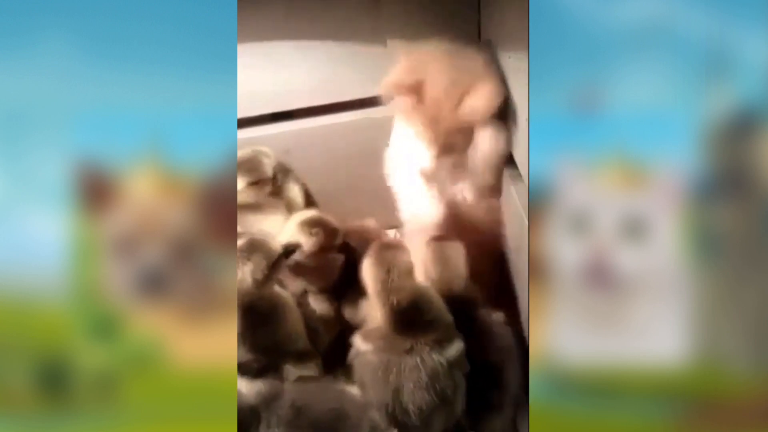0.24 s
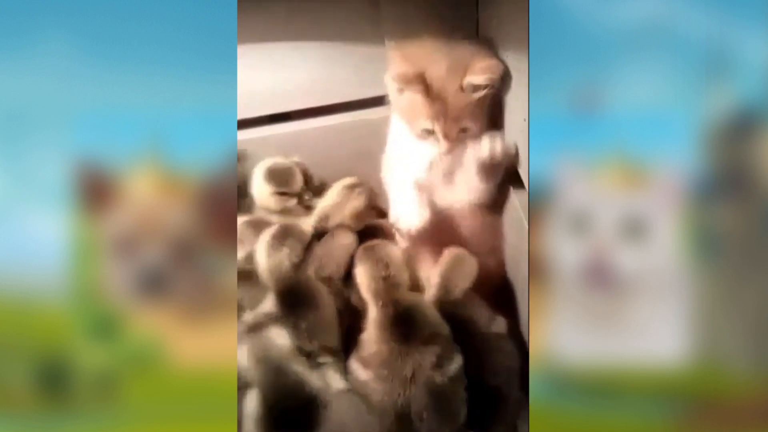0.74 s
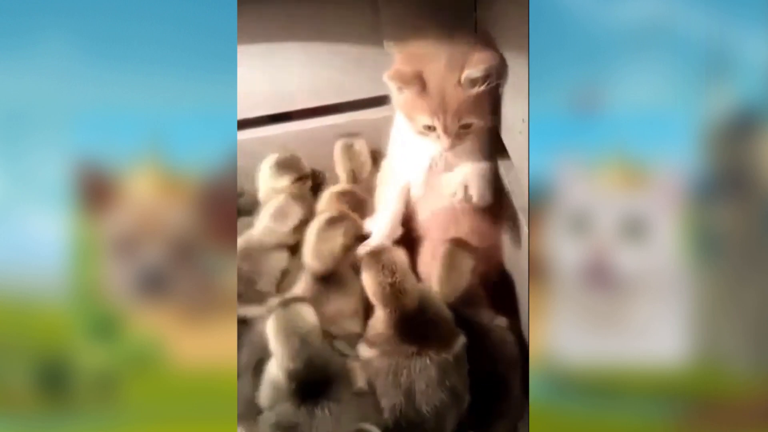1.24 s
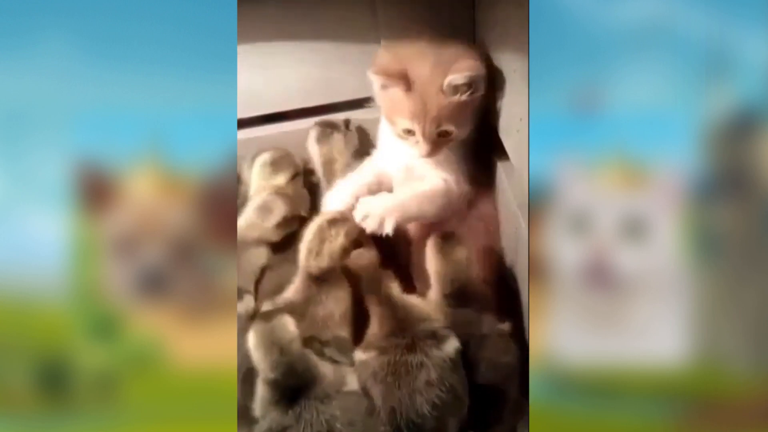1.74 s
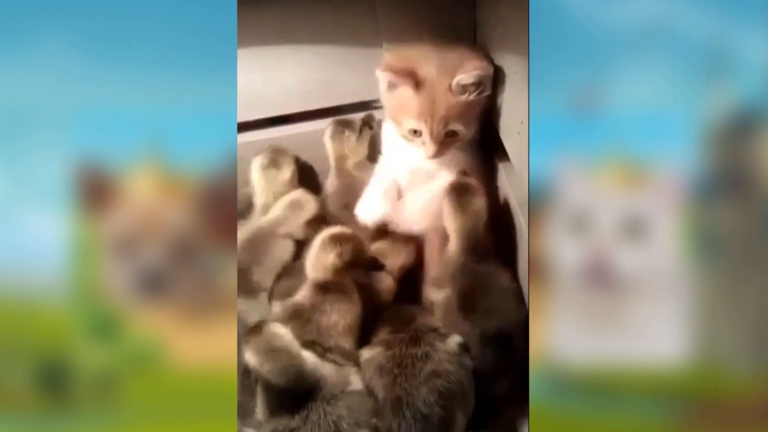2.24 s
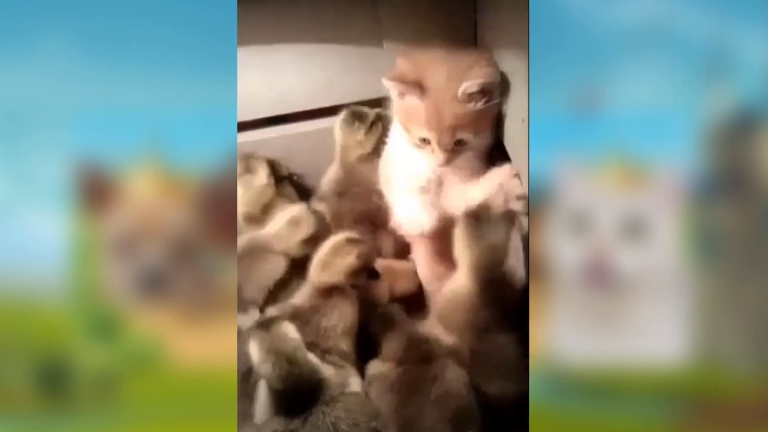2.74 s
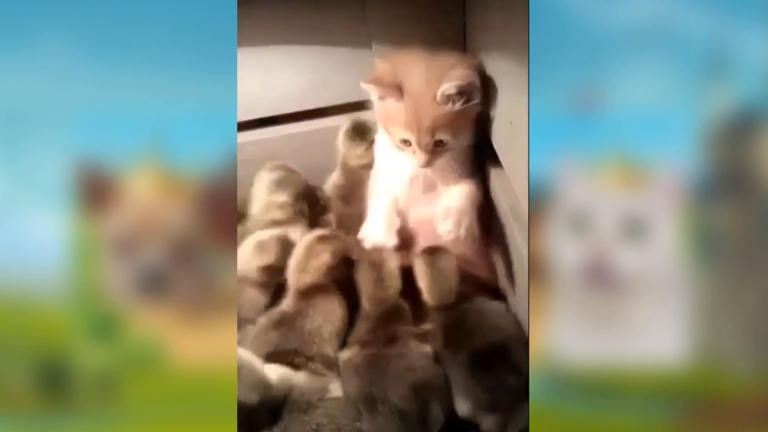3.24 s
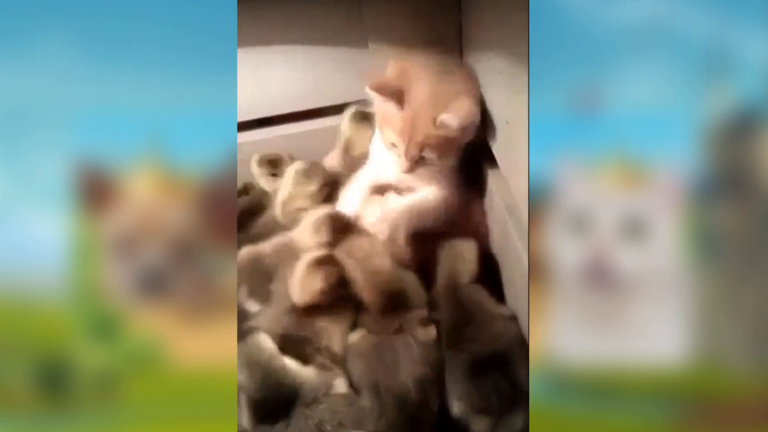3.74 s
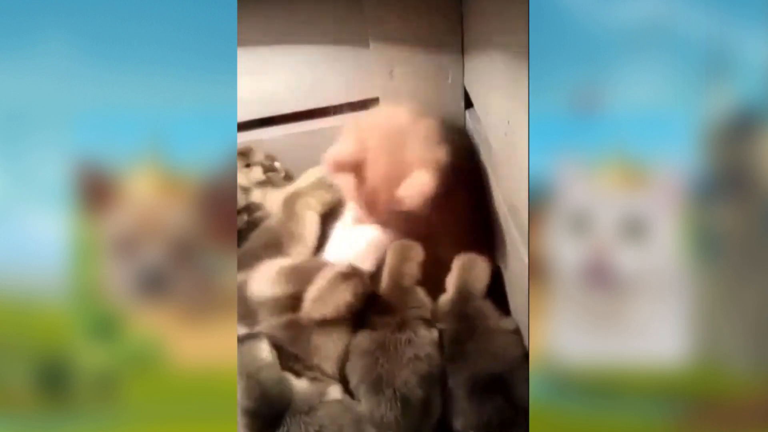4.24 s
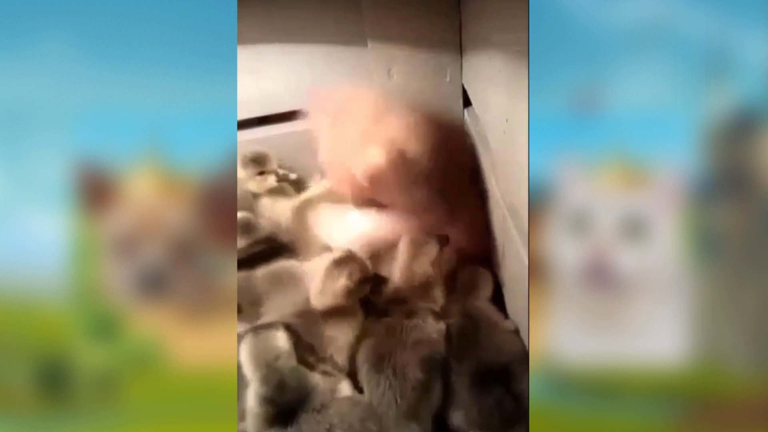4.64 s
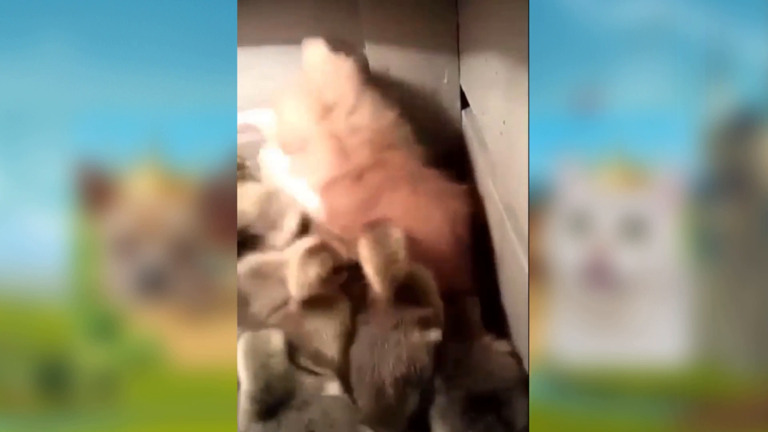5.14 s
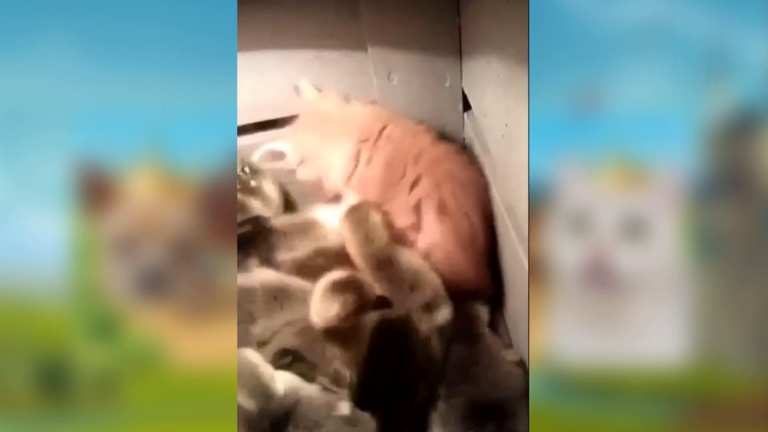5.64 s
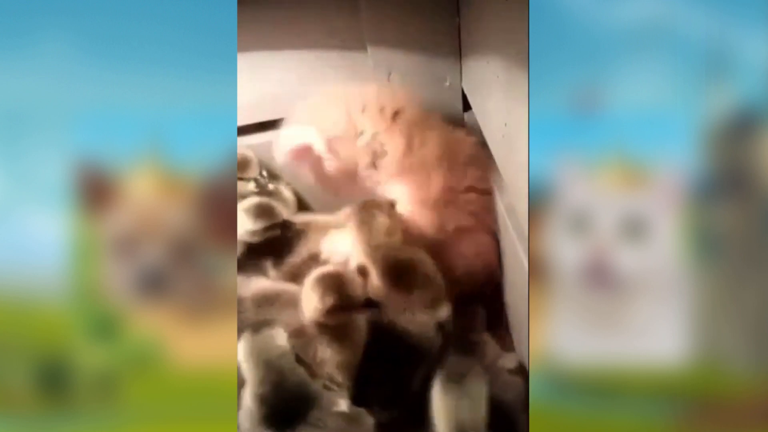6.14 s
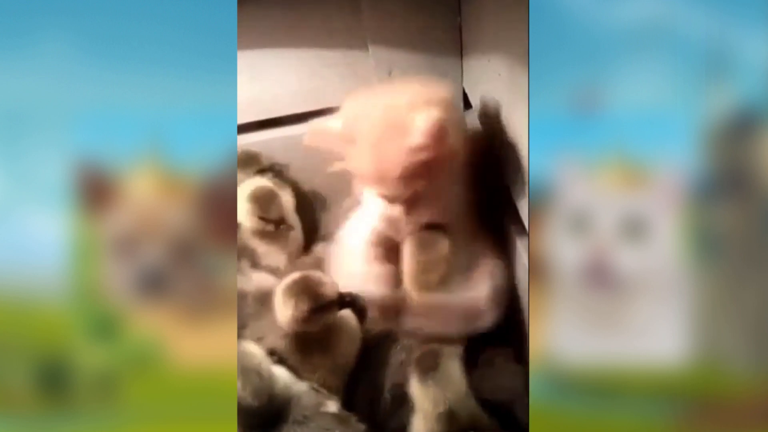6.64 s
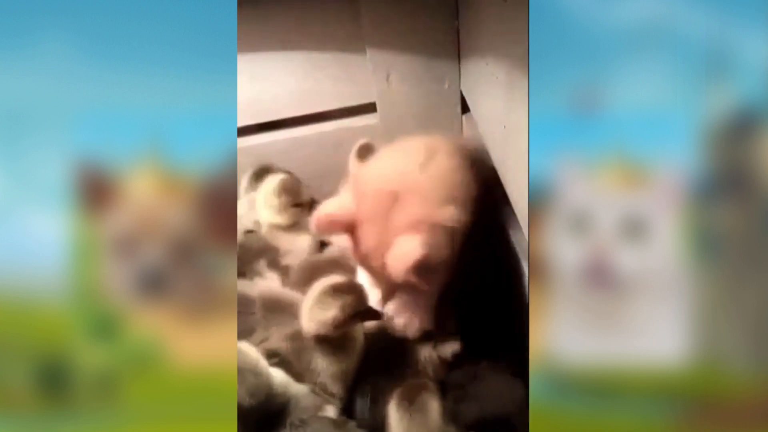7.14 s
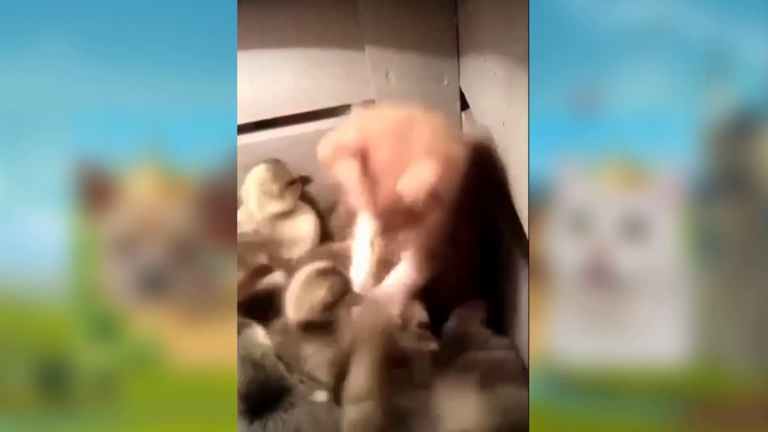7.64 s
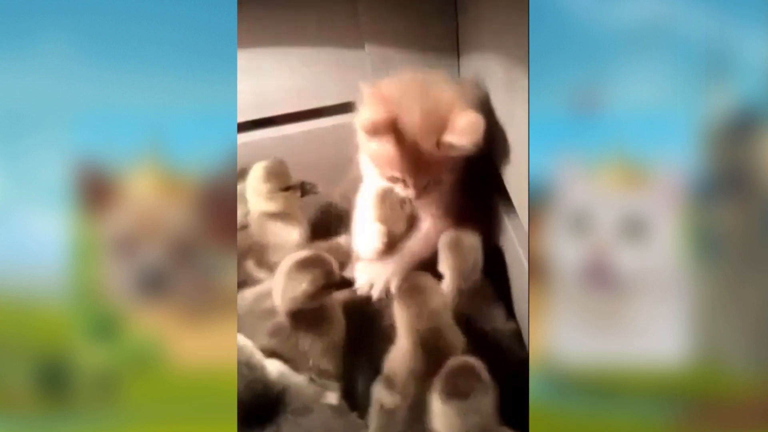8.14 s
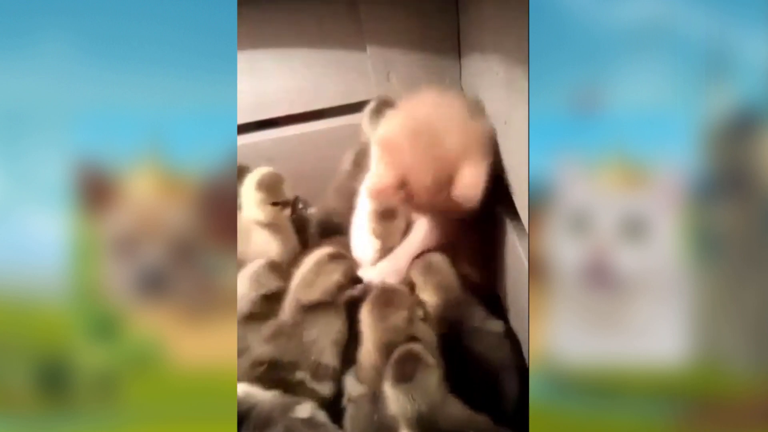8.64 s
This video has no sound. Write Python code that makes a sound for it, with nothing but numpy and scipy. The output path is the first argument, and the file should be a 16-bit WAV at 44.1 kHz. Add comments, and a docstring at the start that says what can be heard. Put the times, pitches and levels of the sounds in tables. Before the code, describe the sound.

Short, thin, high duckling chirps run throughout, some clear and piercing, others faint and hoarse from deep in the huddle. Underneath, bodies rub dryly on cardboard, webbed feet patter and claws tick. Dull boxy knocks fall irregularly, clustering around four, six and just before eight seconds. Heard close up, with quick reflections from box walls and a small quiet room.

```python
"""A crowd of ducklings peeps in a cardboard box while a kitten paws among them, all heard close by.
Each peep is a near-pure whistle that arches up and down in pitch, with unsteady overtones and a little hiss.
Paws and feet knock the panels: damped sines for dents and box modes, low noise for the flexing panel.
Claws and bills tick and scrape, as shaped noise bursts over a noise rustle that rises and falls as bodies
rub on the card. Box walls and a small room answer as decaying noise echoes; a faint murmur of air lies beneath."""
import sys
import numpy as np
from scipy import signal
from scipy.fft import rfft, irfft
from scipy.io import wavfile

SR = 44100
rng = np.random.default_rng(int(sys.argv[2]) if len(sys.argv) > 2 else 0)


def master(y):
    """Save y as 16-bit WAV."""
    cut = np.clip(np.atleast_2d(y).T, -1, 1)
    pcm = np.round(cut * 32767)  # scale
    wavfile.write(sys.argv[1], SR, pcm.astype(np.int16))


N = 391608

# The louder peeps, level taken before the throat resonance, overtone before the common trim and flutter:
# (start [s], length [s], top pitch [Hz], sweep from foot to top [Hz], level [dB], octave overtone [dB])
PEEPS = [(0.138, 0.042, 2584, 199, -38.5, -3.5), (0.232, 0.088, 2794, 1150, -44.5, -9),
         (0.287, 0.03, 1754, 260, -51.5, -21), (0.38, 0.053, 2720, 300, -40.5, -2.5),
         (0.389, 0.055, 1920, 336, -47.5, -12), (0.472, 0.016, 1944, 200, -48, -3.5),
         (0.54, 0.049, 2034, 502, -48.5, -3), (0.564, 0.056, 2357, 480, -56, -9),
         (0.719, 0.071, 2740, 788, -50.5, 0), (0.794, 0.037, 2490, 690, -42.5, -8),
         (0.904, 0.098, 2384, 572, -48.5, -0.5), (0.996, 0.048, 2815, 898, -37, -5),
         (1.472, 0.049, 2163, 442, -53, -26), (1.629, 0.031, 2140, 323, -51.5, -6),
         (1.842, 0.1, 2990, 890, -49, -6), (1.907, 0.079, 2080, 449, -44, -25),
         (1.889, 0.054, 2570, 761, -41.5, -9), (1.916, 0.072, 2768, 563, -28.5, -9),
         (2.032, 0.042, 2160, 366, -48, -3), (2.056, 0.044, 2750, 895, -37, -7),
         (2.135, 0.077, 3120, 1085, -28, -8.5), (2.205, 0.061, 2670, 340, -40, -6),
         (2.265, 0.057, 2122, 377, -41, -18), (2.412, 0.042, 2630, 404, -44, -16),
         (2.626, 0.046, 2160, 336, -55, -26), (2.777, 0.05, 2394, 674, -47.5, -23),
         (2.779, 0.071, 3050, 810, -47, -14), (2.945, 0.048, 2750, 890, -39.5, -11),
         (3.01, 0.081, 2860, 894, -44, -5), (3.376, 0.081, 2435, 468, -45.5, -6.5),
         (3.558, 0.068, 2060, 436, -44, -9), (3.62, 0.094, 2895, 878, -37.5, -6),
         (3.763, 0.064, 2110, 475, -40.5, -23), (4.003, 0.051, 2336, 584, -38, -21),
         (4.157, 0.056, 2940, 1250, -40.5, -18), (4.311, 0.051, 2260, 423, -38.5, -17),
         (4.307, 0.065, 3100, 1407, -46, -25), (4.397, 0.083, 2870, 983, -47.5, -17),
         (4.496, 0.026, 2200, 250, -51, -20), (4.549, 0.078, 2620, 694, -46.5, -32),
         (4.715, 0.052, 2230, 590, -49.5, -9), (4.766, 0.064, 2674, 840, -40, -15),
         (4.87, 0.047, 2310, 524, -52, -3), (5.036, 0.012, 1990, 500, -48.5, -22),
         (5.058, 0.015, 1920, 347, -53, -22), (5.076, 0.11, 2905, 1064, -47.5, -6),
         (5.088, 0.034, 2114, 650, -48, -25), (5.189, 0.04, 2280, 150, -45, -1),
         (5.394, 0.08, 2846, 903, -38.5, -9), (5.39, 0.14, 1828, 294, -48.5, -18),
         (5.446, 0.076, 2680, 720, -47.5, -7), (5.539, 0.092, 1954, 392, -52.5, -29),
         (5.572, 0.046, 2415, 612, -41, -20), (5.605, 0.065, 2317, 558, -55, -13),
         (5.722, 0.052, 2445, 513, -57, -18), (5.864, 0.088, 2900, 895, -39, -7),
         (5.897, 0.039, 2880, 89.5, -27.5, -13), (5.932, 0.074, 2257, 580, -43, -10),
         (6.121, 0.071, 2396, 676, -47.5, -5), (6.26, 0.021, 2194, 202, -49.5, -17),
         (6.354, 0.065, 2765, 624, -38.5, -15), (6.457, 0.062, 2480, 542, -45.5, -20),
         (6.484, 0.044, 2230, 410, -42.5, -17), (6.562, 0.072, 2023, 402, -45.5, -9),
         (6.568, 0.084, 2748, 794, -45, -3), (6.644, 0.034, 2370, 468, -50, 4),
         (6.735, 0.066, 2547, 765, -46.5, 1), (6.739, 0.034, 2410, 588, -41.5, -12),
         (6.899, 0.04, 2430, 297, -39, -9), (7.045, 0.064, 2020, 264, -63, -18),
         (7.107, 0.095, 2900, 902, -45, -10), (7.154, 0.054, 2454, 398, -41, -7.5),
         (7.185, 0.059, 2510, 330, -56, -16), (7.364, 0.033, 2015, 208, -48, -14),
         (7.399, 0.086, 2940, 943, -47, -22), (7.48, 0.067, 2256, 423, -46.5, -6),
         (7.604, 0.026, 2550, 406, -37, -23), (8.017, 0.034, 2527, 580, -34.5, -19),
         (8.059, 0.048, 2413, 344, -40.5, -7.5), (8.133, 0.034, 1985, 327, -52.5, -13),
         (8.275, 0.043, 2150, 334, -49.5, -12), (8.299, 0.042, 2505, 320, -37.5, -4.5),
         (8.342, 0.099, 2603, 850, -51.5, -8), (8.45, 0.091, 3050, 1197, -40, -4),
         (8.578, 0.035, 2125, 211, -44, -21), (8.629, 0.072, 2810, 658, -50, -8),
         (8.787, 0.018, 1924, 180, -45.5, -5.5), (8.838, 0.039, 1900, 260, -43, -32),
         (8.854, 0.049, 2650, 638, -36.5, -8.5)]
# Modes of the box: (frequency [Hz], relative level [dB], time to fall 60 dB [s])
BOX_MODES = [(170, -16, 0.048), (280, -12, 0.035), (322, -8.5, 0.094), (371.4, -5, 0.13), (433, -15, 0.036),
             (482, -9, 0.05), (622, -3, 0.12), (715, -4.5, 0.078), (830, -1.5, 0.041), (990, -4, 0.036),
             (1138, -6.5, 0.034), (1730, -3, 0.016)]
# Spectrum of a rasp on the card: (frequency [Hz], relative level per Hz [dB])
CARD_RASP = [(150, -1.5), (400, 1.5), (700, -3.5), (1400, -9.5), (3200, -7), (5200, 0), (7500, -6),
             (10500, -10), (13000, -16.5), (15500, -40)]
# Restlessness of the huddle, which drives its rustle: (time [s], level before the rustle gain [dB])
RESTLESSNESS = [(0, -50), (.09, -58.5), (.3, -64), (1.0, -59.5), (1.42, -63), (1.56, -66), (1.78, -72),
                (1.9, -60), (2.3, -60), (2.64, -70.5), (2.8, -68), (3.2, -68), (3.6, -58.5), (4.4, -64),
                (4.6, -72), (4.85, -60), (5.6, -66), (5.98, -56.5), (6.9, -67.5), (7.2, -62), (7.4, -67.5),
                (7.74, -60), (7.99, -59.5), (8.88, -62)]

# A peep is softer at its feet than at its top, and fades over a share of its length either side of each foot
FOOT_DB, FADE_SHARE = -7.5, .045
# The usual faint peep; its sweep grows with this power of the top pitch
USUAL_TOP_HZ, USUAL_LENGTH_S, SWEEP_HZ, SWEEP_POWER = 2330, .055, 598, 2.9
# Each scratch fades in briefly to its peak: time from start to peak, and time constant of the fade-in
SCRATCH_LEAD_S, SCRATCH_FADE_IN_S = .008, 0.0015
TOP_HZ = 15100  # upper limit of the whole sound


def undb(db):
    """Decibels to gain."""
    return 10 ** (np.asarray(db) / 20)


def unit(x):
    """Scale to rms 1."""
    return x / np.sqrt(np.mean(x ** 2))


def clock(seconds):
    """Sample times from zero."""
    return np.arange(int(seconds * SR)) / SR


def ring_down(t, t60):
    """Exponential decay that falls 60 dB in t60 seconds."""
    return np.exp(-np.log(1000) * t / t60)


def add(track, start, sound):
    """Mix a sound into the track at a time in seconds."""
    i = max(int(start * SR), 0)
    track[i:i + len(sound)] += sound[:max(N - i, 0)]


def colour(x, points):
    """Filter by a spectrum of (Hz, dB) points, joined by straight lines over log frequency."""
    hz, db = np.transpose(points)
    bins = np.linspace(1, SR / 2, len(x) // 2 + 1)
    gain = undb(np.interp(np.log(bins), np.log(hz), db))
    return irfft(rfft(x) * gain, len(x))


def wander(t, rate):
    """Smooth chance of spread near 1 that heads for a new value rate times a second."""
    steps = rng.standard_normal(int(t[-1] * rate) + 2)
    # straight lines between the values lower the spread; the root makes up for it
    return np.sqrt(3 / 2) * np.interp(t * rate, np.arange(len(steps)), steps)


def air(level_db=-65.5):
    """The room's quiet murmur of air: steady noise, strongest in the lows."""
    # Spectrum of the air: (frequency [Hz], relative level per Hz [dB])
    murmur = [(25, 2), (50, -8.5), (78, -2.5), (110, -6.5), (250, -14), (380, -9.5), (500, -21.5),
              (650, -9.5), (900, -29), (5000, -25.5), (15000, -51)]
    return undb(level_db) * unit(colour(rng.standard_normal(N), murmur))


def reflections(t60, delay):
    """A dense train of echoes of unit energy that dies away after a short delay."""
    t = clock(t60 + delay)
    tail = rng.standard_normal(len(t)) * ring_down(t, t60) * (t > delay)
    return tail / np.linalg.norm(tail)


def echoes(x, t60, db, delay):
    """The reflected share of a sound, without the direct sound."""
    return undb(db) * signal.fftconvolve(x, reflections(t60, delay))[:N]


def rubbing(fidget_db=2.5, fidget_rate=14):
    """How hard bodies rub on the card: the huddle fidgets all the time, and each drag swells and fades."""
    # Single drags of a paw or a wing along the card: (middle [s], half span [s], level before the gain [dB])
    drags = [(0.043, 0.051, -57.5), (0.382, 0.056, -54.5), (2.298, 0.015, -51), (2.992, 0.041, -55),
             (3.106, 0.068, -60.5), (3.418, 0.042, -59.5), (4.029, 0.09, -59), (4.236, 0.11, -62),
             (4.792, 0.11, -61), (5.076, 0.049, -52.5), (5.667, 0.082, -63.5), (5.916, 0.12, -50.5),
             (6.128, 0.07, -56.5), (6.524, 0.075, -59.5), (6.678, 0.019, -63), (7.544, 0.12, -59.5),
             (7.62, 0.049, -49.5), (7.664, 0.032, -50), (7.724, 0.1, -46.5), (7.846, 0.047, -49.5)]
    t = np.arange(N) / SR
    restless_db = np.interp(t, *np.transpose(RESTLESSNESS))
    effort = undb(restless_db + fidget_db * wander(t, fidget_rate))
    for middle, half_span, db in drags:
        swell = np.hanning(int(2 * half_span * SR)) ** 2
        add(effort, middle - half_span, undb(db) * swell)
    return effort


def card_rasp(t, catch_db, patchy_db, crackle_db):
    """Down and feet catch on the card: flickering bands of noise, with sparse clicks of single fibres."""
    # each contact has its own colour, so the bands flicker apart
    edges = np.geomspace(900, 16000, num=13)
    rasp = np.zeros(N)
    for band in zip(edges, edges[1:]):
        bandpass = signal.butter(2, band, "band", fs=SR, output="sos")
        hiss = signal.sosfilt(bandpass, rng.standard_normal(N))
        rasp += hiss * undb(patchy_db * wander(t, 55))
    # single fibres snag and let go about 250 times a second
    crackle = rng.standard_normal(N) * (rng.random(N) < 250 / SR)
    mix = unit(rasp) + undb(crackle_db) * unit(crackle)
    return colour(mix * undb(catch_db * wander(t, 110)), CARD_RASP)


def treading(t, patchy_db):
    """Uneven treading stirs the box modes: patchy noise passed through their ringing."""
    steps = rng.standard_normal(N) * undb(patchy_db * wander(t, 35))
    ring = clock(.2)
    box = np.zeros(len(ring))
    for hz, db, t60 in BOX_MODES:
        tone = np.sin(2 * np.pi * hz * ring + rng.uniform(0, 2 * np.pi))
        box += undb(db) * tone * ring_down(ring, t60)
    return signal.fftconvolve(steps, box)[:N]


def scuffle(gain_db=2, catch_db=1.5, patchy_db=5.0, crackle_db=-3,
            tread_db=-10.0, tread_patchy_db=7, heaviest_db=-54):
    """Down and feet drag over the card in tiny catches; the treading also stirs the box modes."""
    t = np.arange(N) / SR
    effort = rubbing()
    rasp = unit(card_rasp(t, catch_db, patchy_db, crackle_db))
    tread = unit(treading(t, tread_patchy_db))
    # a hard drag rasps more, but its treading stops growing at a limit
    weight = np.minimum(effort, undb(heaviest_db))
    return effort * undb(gain_db) * rasp + weight * undb(tread_db) * tread


def scratch(decay):
    """A short burst of rasp from the surface of the card; it peaks SCRATCH_LEAD_S after its start."""
    t = clock(.1) - SCRATCH_LEAD_S
    envelope = np.exp(np.minimum(t / SCRATCH_FADE_IN_S, -t / decay))
    return unit(colour(rng.standard_normal(len(t)), CARD_RASP)) * envelope


def dent(t, hz, t60, press_s=0.00035):
    """The struck spot of a panel is pressed in and swings back at its own pitch."""
    press = 1 - np.exp(-t / press_s)
    return np.sin(2 * np.pi * hz * t) * press * ring_down(t, t60)


def patter(level_db=-54, spread_db=5, spot_hz=450, spread_octaves=0.83, t60=0.026, claw_db=-6, count=110):
    """Webbed feet pad about at random, each on a different spot, softer when the huddle is calm."""
    out = np.zeros(N)
    times, restless_db = np.transpose(RESTLESSNESS)
    usual_db = np.median(restless_db)
    for when, strength, pitch in rng.uniform(-1.1, 1, (count, 3)):
        start = (when + 1) / 2 * N / SR  # the few below zero land at the very start
        calm_db = min(np.interp(start, times, restless_db) - usual_db, 0)
        db = level_db + spread_db * strength + calm_db
        hz = spot_hz * 2 ** (spread_octaves * pitch)
        add(out, start, undb(db) * dent(clock(.1), hz, t60))
        add(out, start - SCRATCH_LEAD_S, undb(db + claw_db) * scratch(0.0013))
    return out


def ticks(gain_db=3, decay=0.0015, skirt_db=-7):
    """Hard little contacts, too brief to move the panels, each with its own bright resonance."""
    # Claws and bills on the card: (peak time [s], level before the gain [dB], pitch of the click [Hz])
    contacts = [(0.7343, -41.5, 5300), (1.123, -37.5, 5900), (2.232, -36, 5000), (2.7861, -36.5, 4740),
                (5.535, -34, 7700), (5.797, -40.5, 6960), (5.837, -38.5, 5600), (6.023, -39, 6300),
                (6.115, -39.5, 5460), (6.3106, -37, 5200), (6.4727, -40, 5000), (6.484, -31.5, 5240),
                (6.9877, -39.5, 5250), (7.5856, -28, 5860), (7.711, -35, 6500), (7.725, -28.5, 5150),
                (7.739, -32, 5500), (8.812, -43, 6000)]
    out = np.zeros(N)
    for start, db, hz in contacts:
        resonance = [(hz / 4, 2 * skirt_db), (hz / 1.27, skirt_db), (hz, 2),
                     (hz * 1.57, skirt_db), (hz * 2, skirt_db / 2)]
        click = colour(scratch(decay), resonance)
        add(out, start - SCRATCH_LEAD_S, undb(db + gain_db) * click)
    return out


def box_body(t, level_db):
    """A blow rings all the box modes, their strengths, signs and pitches varied by where it lands."""
    hz, db, t60 = np.transpose(BOX_MODES)[:, :, None]
    spot, detune, side = rng.standard_normal((3, len(BOX_MODES), 1))
    tones = np.sin(2 * np.pi * hz * (1 + 0.046 * detune) * t)
    modes = np.sign(side) * undb(db + 2 * spot) * tones
    body = np.sum(modes * ring_down(t, t60), axis=0)
    return body * undb(level_db) / np.std(body[t < .008])


def panel_thump(t, decay):
    """The panel flexes as a whole: a dying burst of low noise."""
    spectrum = [(45, -33), (85, -1), (150, -8.0), (250, -3.5), (600, -43)]
    flex = colour(rng.standard_normal(len(t)), spectrum)
    return flex / np.std(flex[t < .04]) * np.exp(-t / decay)


def knocks(body_db=-8, dent_db=13.5, thump_db=-5, thump_decay=0.021,
           scratch_db=0.5, scratch_decay=0.0055, settle_db=-13, settle_s=0.0128, count=2):
    """Each blow dents a panel and rings the box; the panel flexes and claws rasp."""
    # Blows on the box, thump and scratch relative to the blow and before their common trims:
    # (time [s], level [dB], panel thump [dB], claw scratch [dB], pitch of the struck spot [Hz],
    # time for the spot to fall 60 dB [s])
    blows = [(.0088, -30, -5.5, 0.5, 650, 0.0084), (0.359, -42, -21, 1.5, 355, 0.02),
             (.6604, -52.5, 3, 6, 617, 0.01), (.682, -46.5, -13, 1.5, 680, 0.021),
             (.856, -58, -6, -1, 230, 0.037), (1.078, -55, -20, 2, 710, 0.018),
             (1.253, -55.5, -12, 4, 660, 0.031), (1.3984, -47, 5.5, -7, 700, 0.011),
             (1.9366, -57, -7, 11, 363, 0.24), (2.3093, -59.5, -4, 12, 390, 0.041),
             (2.371, -62, -7, 14, 368, 0.054), (2.706, -51.5, -25, 8, 480, 0.012),
             (3.261, -61, 8, -17, 256, 0.029), (3.678, -56.5, -14, -6, 570, 0.016),
             (3.8425, -58, 7, 9.5, 302, 0.022), (4.0232, -39, -20, -14, 716, 0.0059),
             (4.104, -38.5, -16, -15, 460, 0.016), (4.105, -53.5, -7, -12, 86, 0.12),
             (4.198, -61, -10, -1, 200, 0.024), (4.2324, -55.5, -19, 8, 384, 0.04),
             (4.345, -60.5, 1, 4, 90, 0.17), (4.417, -55.5, -8, 1, 800, 0.0078),
             (4.8535, -44.5, -6, -5, 450, 0.0078), (4.878, -52, -17, 0, 674, 0.016),
             (5.0847, -39.5, -28, -4, 462, 0.014), (5.1518, -45, -27, -5.5, 736, 0.0083),
             (5.3738, -44.5, -4, -5.5, 364, 0.016), (5.701, -61.5, -13, -4, 456, 0.043),
             (5.9311, -34, -32, -7, 417, 0.021), (5.9337, -33, -17, -5, 1290, 0.0056),
             (6.128, -46.5, -25, -19, 646, 0.017), (6.2759, -55.5, -19, 5, 398, 0.023),
             (6.68, -57.5, -10, 5, 414, 0.024), (6.783, -52.5, -3, -2, 387, 0.016),
             (6.887, -63.5, -11, -25, 362, 0.17), (6.99, -50, -7, -1, 290, 0.013),
             (7.343, -46, -2, -5, 724, 0.01), (7.5894, -39.5, -4, 2, 342, 0.021),
             (7.6808, -32.5, -31, -6, 506, 0.016), (7.6957, -29.5, -41, -3.5, 656, 0.012),
             (7.8988, -39, -26, -0.5, 660, 0.015), (8.44, -54, 3.5, 1.5, 470, 0.015)]
    out, t = np.zeros(N), clock(0.18)
    for start, level_db, low_db, claw_db, spot_hz, spot_t60 in blows:
        body = box_body(t, body_db)
        struck_spot = undb(dent_db) * dent(t, spot_hz, spot_t60)
        thump = undb(low_db + thump_db) * panel_thump(t, thump_decay)
        add(out, start, undb(level_db) * (body + struck_spot + thump))
        claws = undb(level_db + claw_db + scratch_db) * scratch(scratch_decay)
        add(out, start - SCRATCH_LEAD_S, claws)
        # a soft foot settles in a few lighter touches
        for delay in rng.uniform(0, settle_s, count):
            add(out, start + delay, undb(level_db + settle_db) * body)
    return out


def faint_peeps(level_db=-60, level_spread_db=2, pitch_spread=0.13, join_s=0.033, octave_db=-10, count=20):
    """Ducklings deep in the huddle join in softly, close to a louder neighbour; higher peeps sweep further."""
    rows = []
    neighbours = rng.permutation(len(PEEPS))
    chances = rng.uniform(-0.85, 1, (count, 4))
    for neighbour, (when, stretch, pitch, strength) in zip(neighbours, chances):
        start = PEEPS[neighbour][0] + join_s * when
        length = USUAL_LENGTH_S * 2 ** (stretch / 2)
        top_hz = USUAL_TOP_HZ * (1 + pitch_spread * pitch)
        sweep_hz = SWEEP_HZ * (top_hz / USUAL_TOP_HZ) ** SWEEP_POWER
        rows.append((start, length, top_hz, sweep_hz, level_db + level_spread_db * strength, octave_db))
    return rows


def peep(length, top_hz, sweep_hz, db, octave_db, quaver=0.0071, hoarse_quaver=.024, flutter_db=2.5,
         overtone_db=-6, overtone_flutter_db=4.5, closed_bill_db=-4, hiss_db=-11.0,
         third_db=-12, third_fall_db_per_octave=30):
    """One whistle arches through the throat resonance, with weak, unsteady overtones and a little hiss."""
    # Resonance of throat and bill, swept by the gliding pitch: (frequency [Hz], gain [dB])
    throat = [(1500, 4.5), (2000, 2.5), (2450, 1), (2830, -5.5), (3100, -12.5)]
    # Low peeps climb slowly and drop fast, high ones are even: (top pitch [Hz], share of length rising [1])
    rise_shares = [(2100, 0.595), (2600, 0.48)]
    t = clock(length * (1 + 2 * FADE_SHARE))
    along = t / length - FADE_SHARE  # 0 at the first foot, 1 at the last
    rise = np.interp(top_hz, *np.transpose(rise_shares))
    # shallow peeps are round arches, deep ones come to a point; droop is 0 at the top and 1 at either foot
    arch = np.interp(sweep_hz, [400, 1200], [2.1, 1.45])
    droop = np.maximum(1 - along / rise, (along - rise) / (1 - rise)) ** arch
    hz = top_hz - sweep_hz * droop
    # a full voice is clean, a weak one hoarse
    rasp = np.interp(db, [-49, -42], [hoarse_quaver, quaver])
    phase = 2 * np.pi * np.cumsum(hz * (1 + rasp * wander(t, 582))) / SR

    gate = np.minimum(np.minimum(t, t[-1] - t) / (2 * FADE_SHARE * length), 1)
    throat_db = np.interp(hz, *np.transpose(throat))
    loudness = gate * undb(db + FOOT_DB * droop + throat_db + flutter_db * wander(t, 129.0))

    # the third harmonic is weaker in the highest peeps
    octaves_above_usual = max(np.log2(top_hz / USUAL_TOP_HZ), 0)
    third = undb(third_db - third_fall_db_per_octave * octaves_above_usual)
    overtones = np.sin(2 * phase) + third * np.sin(3 * phase)
    breath = colour(rng.standard_normal(len(t)), [(3000, -15), (5000, 1), (9000, -30)])
    hiss = undb(hiss_db) * unit(breath)
    # the bill is widest, and the voice brightest, at the top of the arch
    bill_db = closed_bill_db * droop
    brightness = undb(octave_db + overtone_db + bill_db + overtone_flutter_db * wander(t, 185))
    return loudness * (np.sin(phase) + brightness * (overtones + hiss))


def ducklings(gain_db=0.0, walls_db=-5.5, walls_t60=0.077, open_db=-44, hidden=0.53):
    """Each peep has its own echoes in the box; faint, hidden ones are heard more by way of the walls."""
    out = np.zeros(N)
    for start, length, top_hz, sweep_hz, db, octave_db in list(PEEPS) + faint_peeps():
        path = reflections(walls_t60, 0.0028) * undb(walls_db + hidden * (open_db - db))
        path[0] = 1  # the direct sound
        voice = peep(length, top_hz, sweep_hz, db, octave_db)
        add(out, start - FADE_SHARE * length, signal.fftconvolve(voice, path))
    return out * undb(gain_db)


def scene():
    """Voices and feet in the box, the room around it and its quiet murmur of air."""
    feet = scuffle() + patter() + ticks() + knocks()
    feet_off_walls = echoes(feet, t60=0.076, db=-6.5, delay=0.00333)
    box = ducklings() + feet + feet_off_walls
    room = echoes(box, t60=.3, db=-14.5, delay=0.0063)
    return (box + room + air())[None]


def record(dry):
    """A steep low-pass cuts the top, and a constant offset sets the wave slightly below zero."""
    offset = -.0028  # of full scale
    low_pass = signal.ellip(8, .2, 70, TOP_HZ, fs=SR, output="sos")
    return signal.sosfilt(low_pass, dry) + offset


dry = scene()
out = record(dry)
master(out)
```